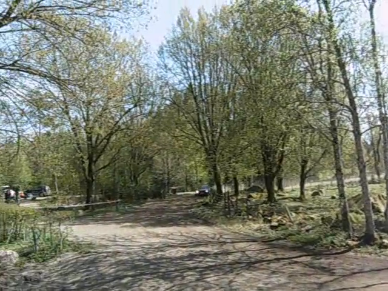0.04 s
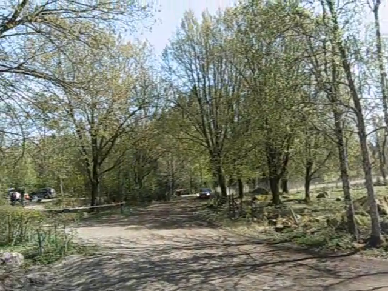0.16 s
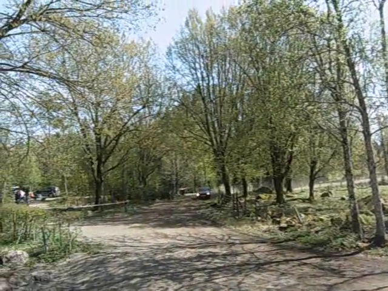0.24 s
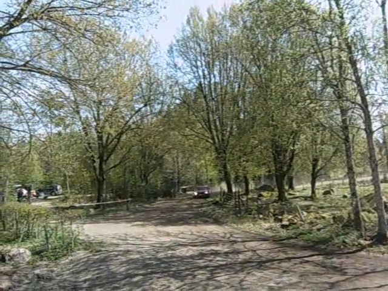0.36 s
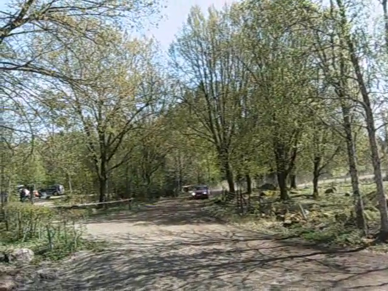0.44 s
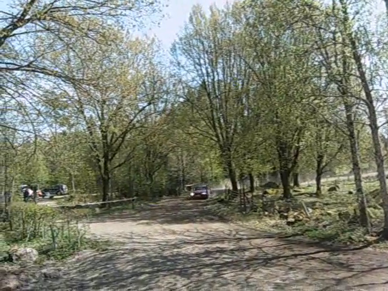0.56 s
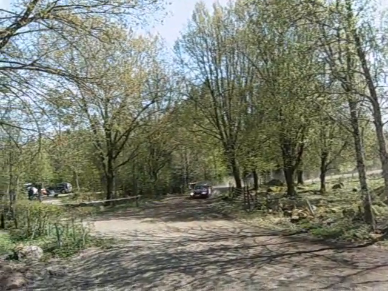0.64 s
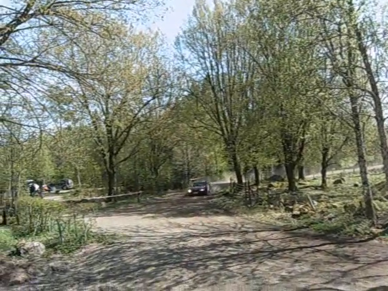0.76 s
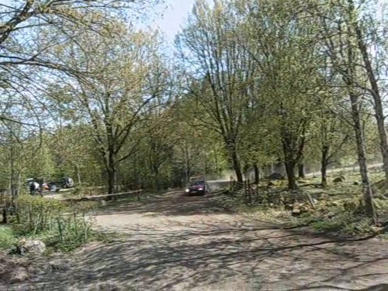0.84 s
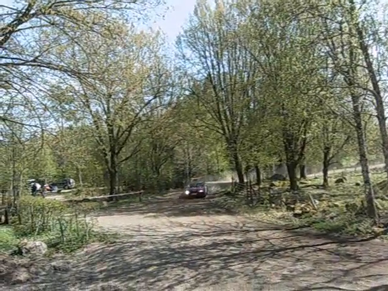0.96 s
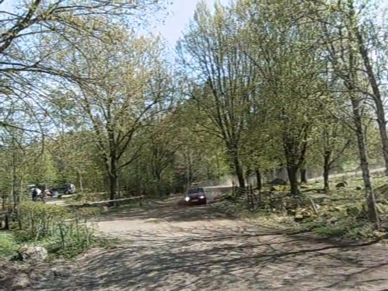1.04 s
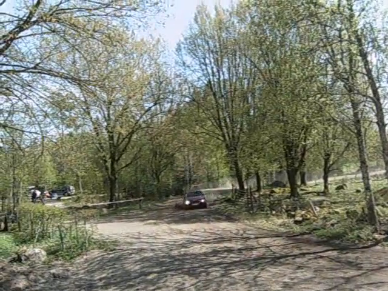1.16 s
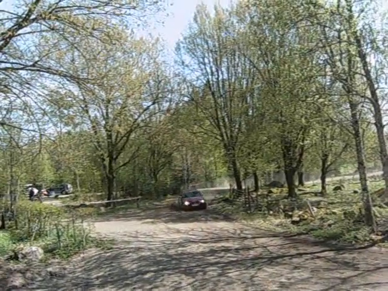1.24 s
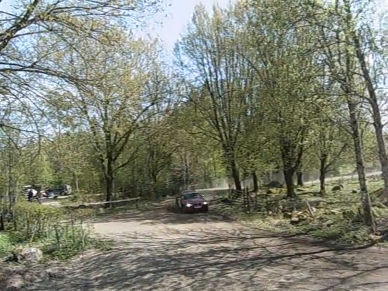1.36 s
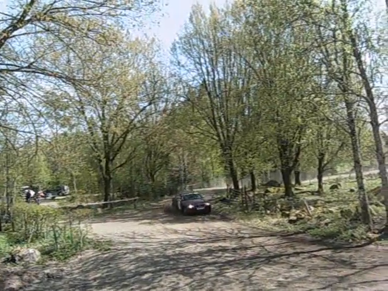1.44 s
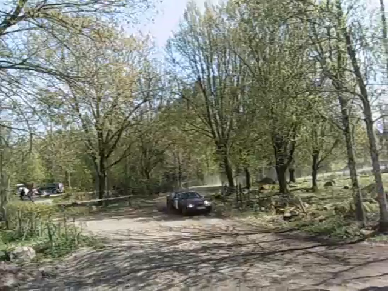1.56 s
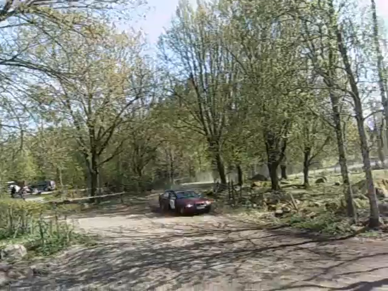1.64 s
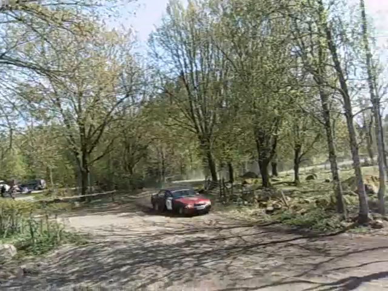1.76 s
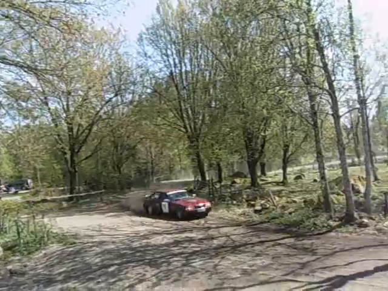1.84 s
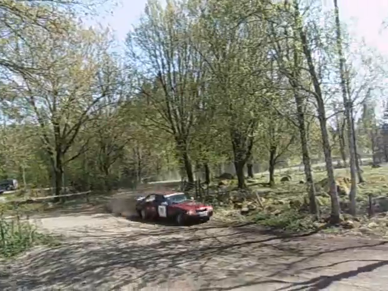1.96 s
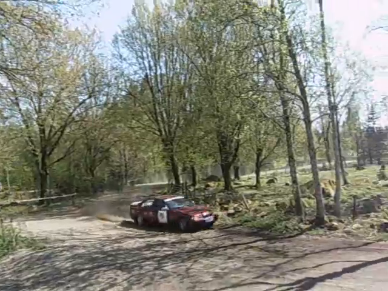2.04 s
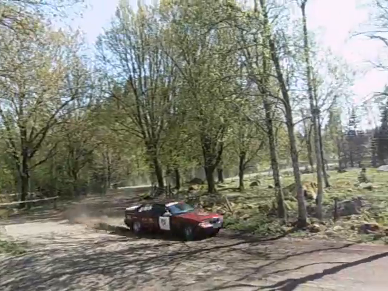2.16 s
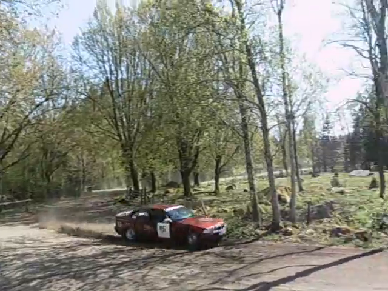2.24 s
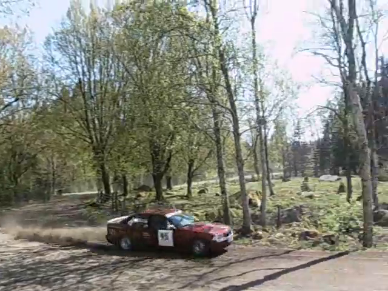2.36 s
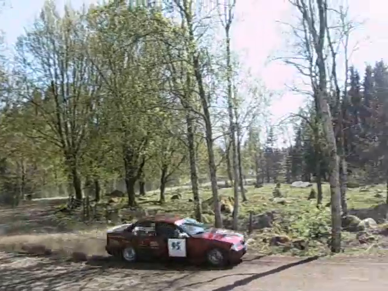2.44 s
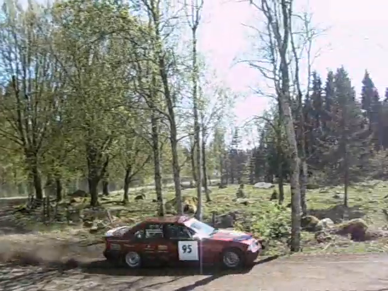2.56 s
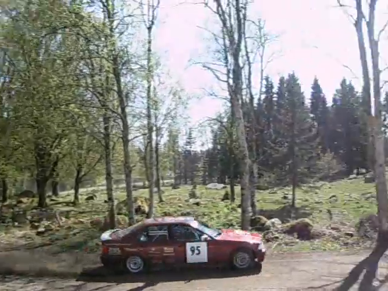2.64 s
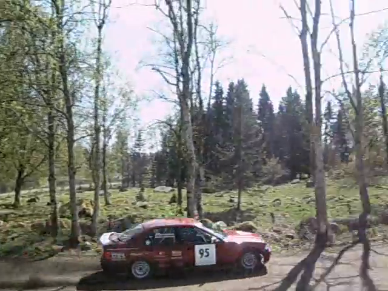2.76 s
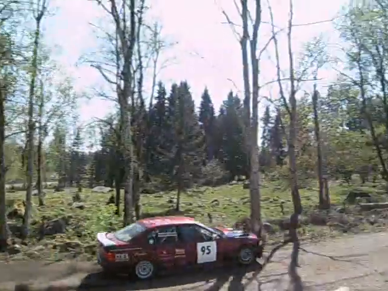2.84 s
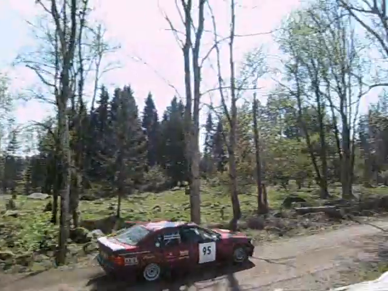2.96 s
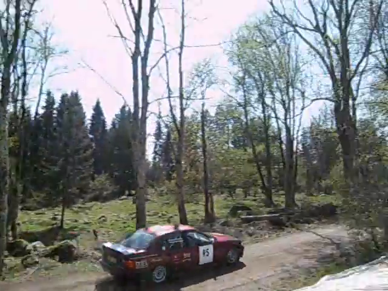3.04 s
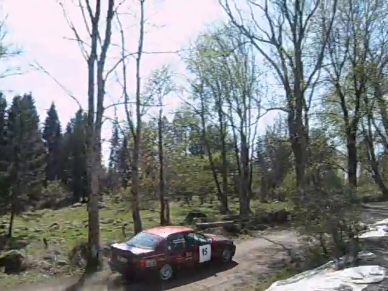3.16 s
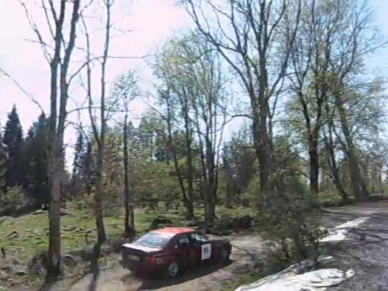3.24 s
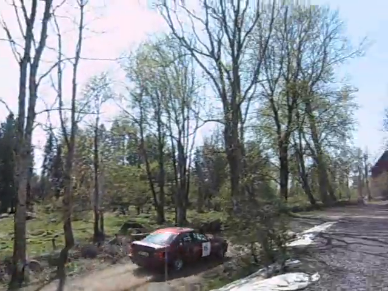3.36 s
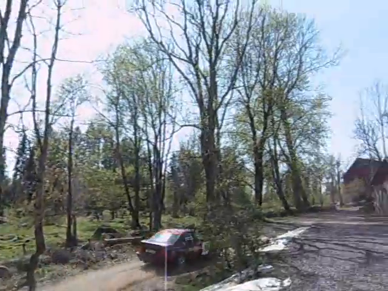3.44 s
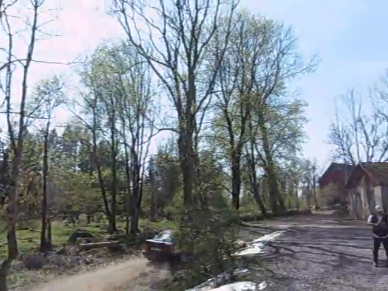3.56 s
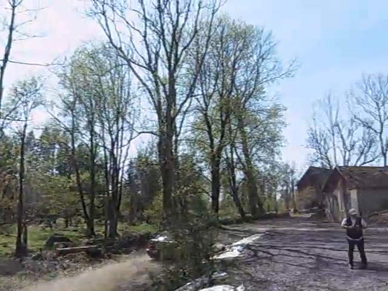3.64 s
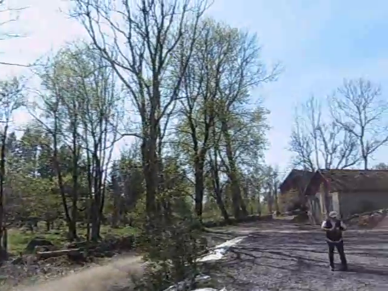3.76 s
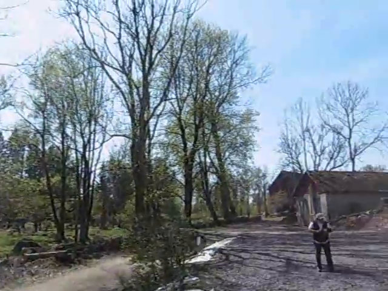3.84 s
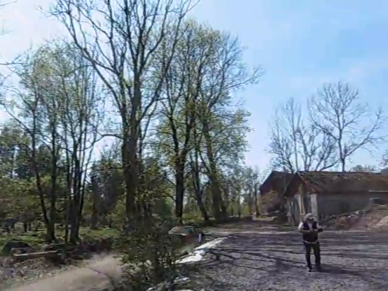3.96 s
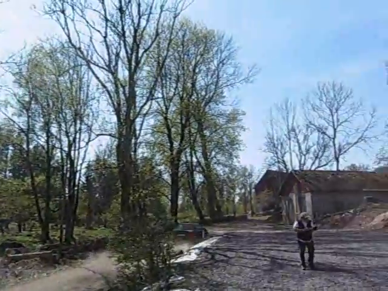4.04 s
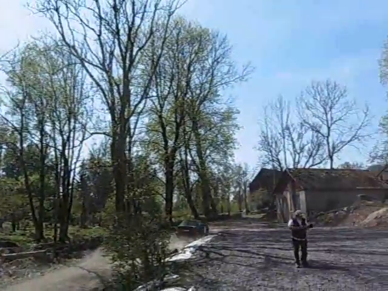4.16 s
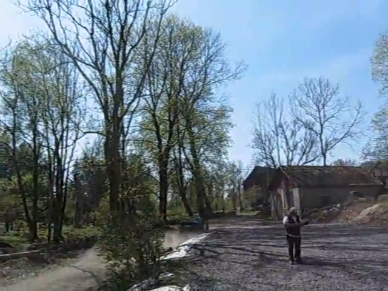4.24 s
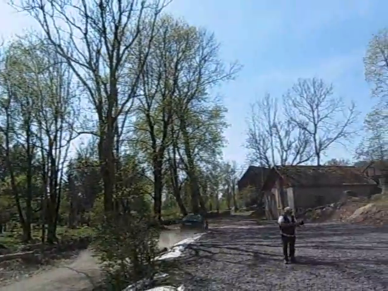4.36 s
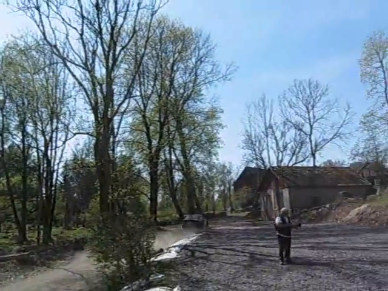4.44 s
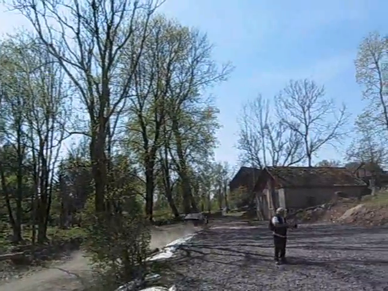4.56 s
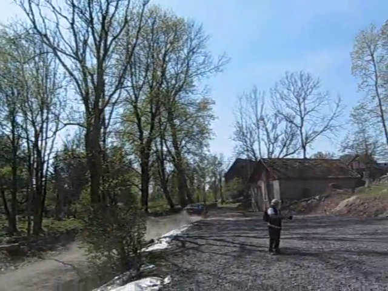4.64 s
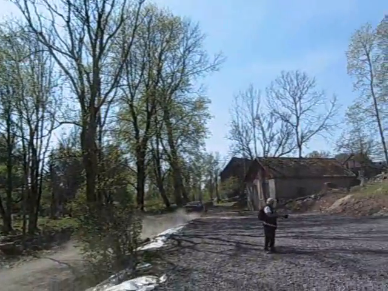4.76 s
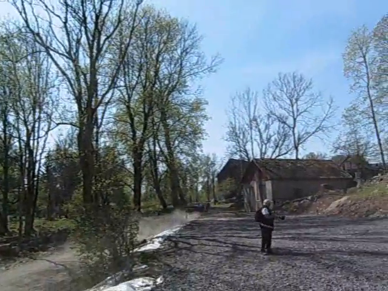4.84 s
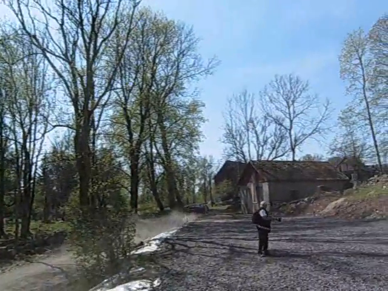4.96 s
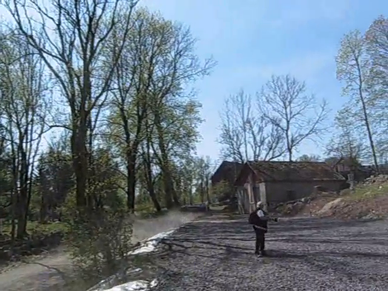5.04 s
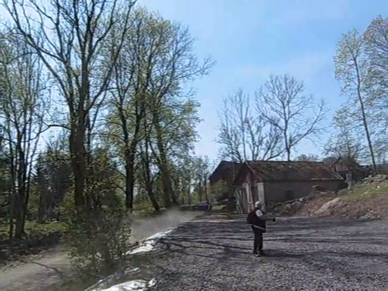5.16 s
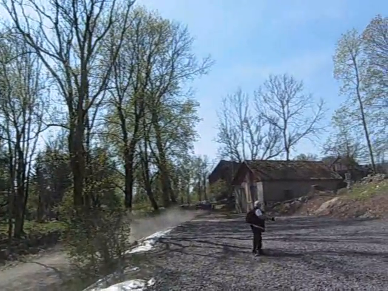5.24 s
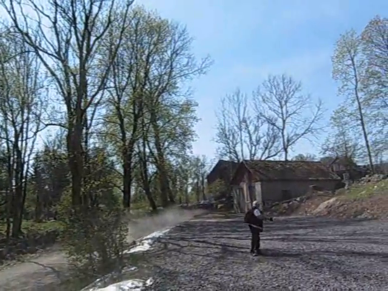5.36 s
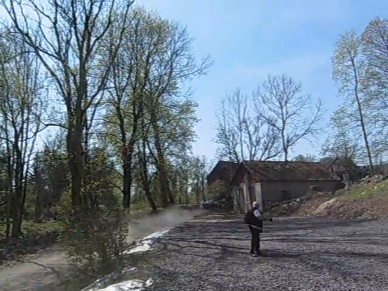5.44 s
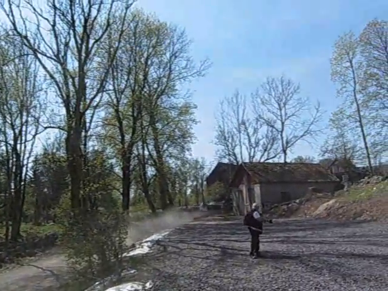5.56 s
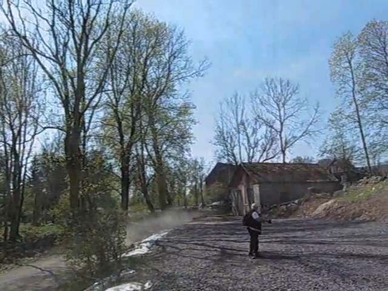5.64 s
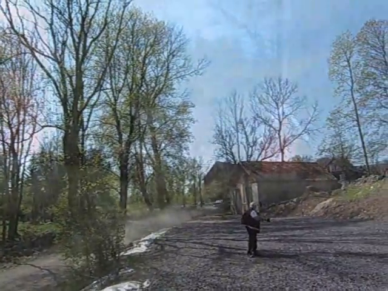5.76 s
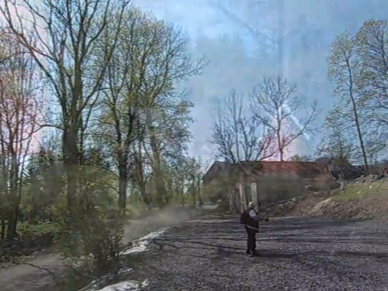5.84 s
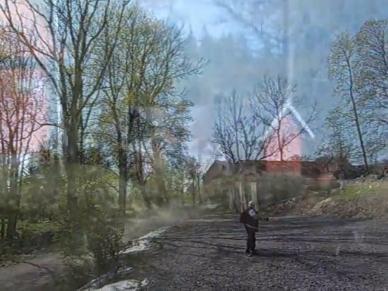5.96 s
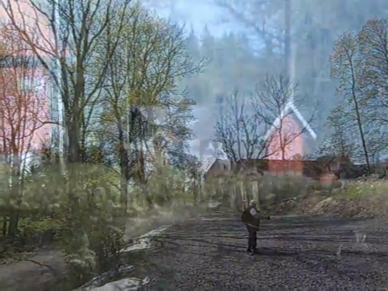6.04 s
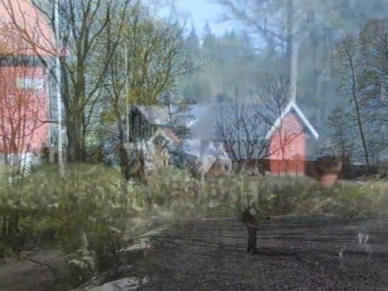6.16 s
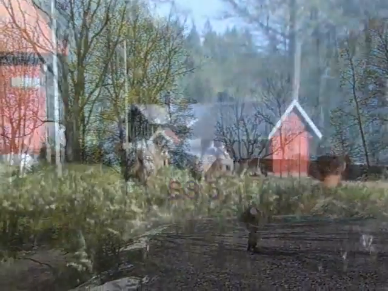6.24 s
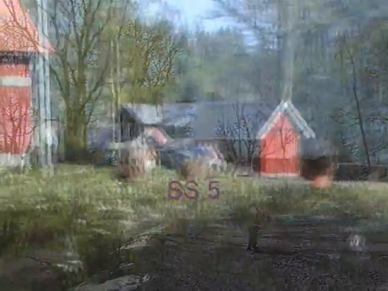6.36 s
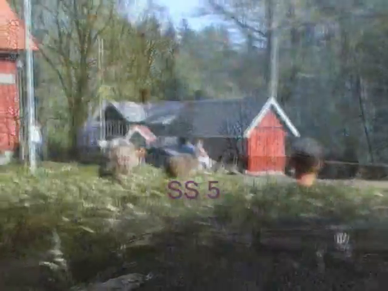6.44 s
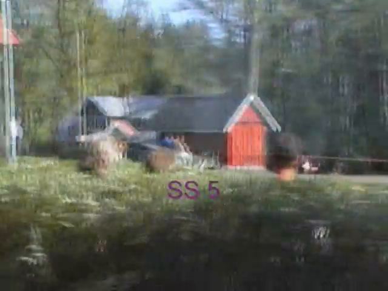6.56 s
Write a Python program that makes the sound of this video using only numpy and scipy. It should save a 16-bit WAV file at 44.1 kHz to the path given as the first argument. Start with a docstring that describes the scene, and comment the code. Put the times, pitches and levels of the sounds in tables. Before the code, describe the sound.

Outdoors on a forest gravel road, a six-cylinder rally car is faint and off throttle, then floors it after a second. The hard, buzzing note climbs and peaks close by at three seconds with gravel hiss and stone clicks. It recedes, lifting twice and reopening. A cheap small microphone adds gritty metallic treble; finally a dull far engine fades in.

```python
"""On a gravel road, a six-cylinder rally car comes out of a wood, floors the throttle, passes close and lifts twice.
The engine is a stack of steady tones plus puffing noise; tyres hiss on gravel, stones click, low air rumbles.
A small camera samples 8000 times a second and holds each value, which mirrors the engine note into the treble.
At the end the sound cross-fades to another, far engine, a smeared note in a dull roar with two sharp ticks,
heard through a full-band microphone."""
import sys
import numpy as np
from scipy import signal
from scipy.fft import rfft, irfft, next_fast_len
from scipy.io import wavfile

SR = 44100
rng = np.random.default_rng(int(sys.argv[2]) if len(sys.argv) > 2 else 0)


def gain_from_db(level_db):
    """Turn a decibel level (scalar or array-like) into a linear amplitude factor."""
    decades = np.asarray(level_db, float) / 20
    return 10 ** decades


def master_out(mix):
    """Clip the mix to full scale and print it as 16-bit PCM to the path in sys.argv[1]."""
    frames = np.transpose(np.atleast_2d(mix))
    ceiling = np.clip(frames, -1, 1)
    pcm = np.round(ceiling * 32767).astype(np.int16)
    wavfile.write(sys.argv[1], SR, pcm)


N = 291060  # length in samples

# low rumble of air and ground, before the engine gain: time_s, level_db
RUMBLE_LEVEL = [(0.0, -54), (.5, -51), (1.4, -50), (2.25, -43), (3.03, -40), (3.3, -50), (3.44, -37),
                (3.55, -51), (3.81, -55), (4.0, -42.5), (4.5, -44), (5.1, -46), (5.25, -55), (6.05, -54)]
# its tone: freq_hz, relative_db (per Hz)
RUMBLE_TONE = [(20, -13), (45, -9.5), (90, 1), (140, -3), (250, -6.5)]

# the far engine: time_s, firing_hz, note_db, roar_db
FAR_ENGINE = [(5.8, 224.7, -68, -49), (6.1, 234, -43, -43), (6.25, 246.3, -49, -36),
              (6.42, 251.2, -41, -33.5), (6.5, 245.8, -51, -34), (6.6, 243.5, -34, -33.5)]
# tone of its dull roar: freq_hz, relative_db (per Hz)
FAR_ROAR_TONE = [(24, -51), (40, -20), (90, -11), (145, -24), (245, 0.5), (297, -36), (335, -17.5),
                 (608, -16), (685, -12.5), (1050, -22), (1270, -22.5), (6450, -47.5), (12000, -55),
                 (15600, -91), (22000, -120)]
# a thin steady tone that rises and falls with the roar: pitch_hz, relative_db
FAR_WHINE = [(6395, -76)]
# dry ticks near the microphone, before filtering: start_s, relative_db, low_hz (weakened below this)
TICKS = [(6.346, -31, 2190), (6.351, -39, 2300), (6.361, -42, 2500), (6.528, -39, 6000)]

# tone of tyres on loose gravel: freq_hz, relative_db (per Hz)
GRAVEL_TONE = [(60, -33), (150, 0), (400, 6), (1000, 4), (1800, 1), (2500, 0.5), (3100, 2.5), (3600, 2.5),
               (4000, -3.5)]
# thrown stones landing, before filtering: start_s, relative_db
STONES = [(1.8167, -24), (3.095, -11), (3.221, -9.5), (3.435, -6.5), (4.072, -20), (4.1323, -26),
          (4.2773, -27), (4.3932, -40), (4.602, -30), (4.7959, -32), (5.166, -33), (5.326, -28),
          (5.487, -30), (5.7727, -31), (5.8535, -39)]
CRACKLES_PER_S, CRACKLE_DB = 15, 8  # small stones at random; typical level over the hiss

# firing rate as heard, Doppler shift included: time_s, firing_hz
FIRING_RATE = [(0.0, 219.2), (0.38, 171.2), (1.05, 173.8), (1.15, 187.2), (1.36, 236), (1.62, 271.1),
               (1.88, 293.4), (2.25, 291.3), (2.42, 303.4), (2.72, 312.7), (2.87, 304.7), (3.01, 284.8),
               (3.15, 287.2), (3.5, 280.1), (3.85, 288.4), (3.98, 299.5), (4.14, 303), (4.45, 240.6),
               (4.85, 207), (5.04, 185.7), (5.2, 205), (5.5, 204.9), (5.72, 213), (6.0, 212.2),
               (6.3, 217.2)]
# tone of the turbulent exhaust and intake: freq_hz, relative_db (per Hz)
RASP_TONE = [(60, -34), (120, -17), (200, -2), (500, 2), (1000, 1), (1600, -6), (2100, -17.5), (4000, -31)]
# Tones at multiples of the engine cycle (six firings), heard from each side of the car.
# Each of these seven tables: multiple (of the cycle rate), relative_db
VIEW_AFAR = [(1, -29), (2, -26), (3, -17), (4, -19), (5, -22), (6, -7), (7, -23), (8, -23), (9, -21),
             (10, -18), (11, -12), (12, 0), (13, -16), (14, -15), (15, -7), (16, -16), (17, -19), (18, -16),
             (19, -19), (20, -16), (21, -9), (22, -15), (23, -22), (24, -13), (25, -21), (26, -21),
             (27, -25), (28, -21), (29, -23), (30, -19), (31, -21), (32, -21), (33, -19), (34, -22),
             (35, -25), (36, -20)]
VIEW_FRONT = [(1, -30), (2, -22), (3, -11), (4, -12), (5, -20), (6, 0), (7, -19), (8, -23), (9, -16),
              (10, -12), (11, -16), (12, -6), (13, -14), (14, -17), (15, -17), (16, -15), (17, -23),
              (18, -10), (19, -17), (20, -17), (21, -15), (22, -17), (23, -22), (24, -19), (25, -29),
              (26, -26), (27, -22), (28, -21), (29, -15), (30, -20), (31, -25), (32, -26), (33, -27),
              (34, -27), (35, -30), (36, -26)]
VIEW_ABREAST = [(1, -41), (2, -32), (3, -24), (4, -20), (5, -32), (6, 0), (7, -22), (8, -26), (9, -17),
                (10, -20), (11, -23), (12, -8), (13, -22), (14, -26), (15, -23), (16, -30), (17, -34),
                (18, -17), (19, -28), (20, -30), (21, -24), (22, -30), (23, -35), (24, -23), (25, -31),
                (26, -36), (27, -28), (28, -30), (29, -34), (30, -22), (31, -22), (32, -30), (33, -23),
                (34, -28), (35, -35), (36, -42)]
VIEW_SIDE = [(1, -35), (2, -36), (3, -18), (4, -17), (5, -25), (6, 0), (7, -19), (8, -24), (9, -14),
             (10, -19), (11, -17), (12, -3), (13, -15), (14, -25), (15, -17), (16, -22), (17, -31),
             (18, -12), (19, -26), (20, -24), (21, -18), (22, -28), (23, -29), (24, -17), (25, -23),
             (26, -30), (27, -20), (28, -27), (29, -34), (30, -24), (31, -27), (32, -34), (33, -26),
             (34, -30), (35, -36), (36, -38)]
VIEW_PAST = [(1, -37), (2, -29), (3, -16), (4, -16), (5, -26), (6, 0), (7, -19), (8, -25), (9, -18),
             (10, -15), (11, -17), (12, -5), (13, -15), (14, -29), (15, -20), (16, -16), (17, -27),
             (18, -8), (19, -15), (20, -18), (21, -14), (22, -22), (23, -25), (24, -15), (25, -21),
             (26, -31), (27, -22), (28, -27), (29, -29), (30, -25), (31, -28), (32, -33), (33, -27),
             (34, -22), (35, -29), (36, -33)]
VIEW_TURNING = [(1, -30), (2, -24), (3, -17), (4, -16), (5, -22), (6, 0), (7, -18), (8, -23), (9, -11),
                (10, -22), (11, -22), (12, -3), (13, -18), (14, -23), (15, -13), (16, -21), (17, -26),
                (18, -7), (19, -15), (20, -20), (21, -12), (22, -18), (23, -23), (24, -10), (25, -20),
                (26, -25), (27, -18), (28, -24), (29, -29), (30, -19), (31, -25), (32, -28), (33, -21),
                (34, -25), (35, -30), (36, -28)]
VIEW_REAR = [(1, -39), (2, -33), (3, -27), (4, -28), (5, -28), (6, 0), (7, -26), (8, -32), (9, -16),
             (10, -33), (11, -28), (12, -10), (13, -25), (14, -28), (15, -21), (16, -24), (17, -32),
             (18, -13), (19, -28), (20, -30), (21, -18), (22, -21), (23, -27), (24, -12), (25, -27),
             (26, -32), (27, -27), (28, -32), (29, -35), (30, -29), (31, -36), (32, -36), (33, -29),
             (34, -32), (35, -33), (36, -29)]
# which side is heard: time_s, view (0 afar, 1 front, 2 abreast, 3 side, 4 past, 5 turning, 6 rear)
FACING = [(1.85, 0), (2.25, 1), (2.82, 1), (3.0, 2), (3.2, 2), (3.32, 3), (3.5, 3), (3.7, 4), (4.15, 4),
          (4.4, 5), (4.9, 5), (5.1, 6)]
# sound on throttle, one row per view: clean_db, rasp_db (both over the bark), unsteadiness (0 steady),
# hollowness (0-1), in_step (0-1, one cylinder pops harder)
ON_THROTTLE = [(-2, -5.5, .3, .85, .1), (-2.5, -7, 0.33, 1, .3), (-.3, -11, .1, .45, .1),
               (-.3, -12, .09, 0, .25), (-.3, -9.5, .1, 0.3, .5), (0, -9, .11, .32, 0),
               (.8, -11.5, .115, 0.45, .1)]
# the same five values with the throttle shut
OFF_THROTTLE = (-11, -2, 1.1, .35, 0)
# fixed peaks and dips blended into the noise, most of all with the car afar or head-on: freq_hz, gain_db
HOLLOW_TONE = [(200, 0), (380, -7), (520, 1), (1050, 1.5), (1280, -8), (1500, 4), (1750, -6), (1950, .5),
               (2150, -6), (2450, -.5), (4000, 0)]
# the throttle is floored, held and let go: open_s, opening_takes_s, close_s, closing_takes_s
THROTTLE = [(-.2, .05, 0.038, 0.18), (1.18, .04, 4.01, .14), (4.365, 0.074, 4.86, 0.074),
            (5.095, .045, 6.86, .1)]
FIRING_POWER = 2  # firing is steady only near full throttle: power of the throttle
# loss with the throttle shut, in dB
SHUT_NOTE_DB, SHUT_OCTAVE_DB, SHUT_BARK_DB, SHUT_GRAVEL_DB = -14, -21.5, -18.5, -7.5
# throttle open, as the car nears and leaves, before dips and final gains:
# time_s, note_db (firing note), octave_db, bark_db (exhaust), gravel_db
OPEN_LEVELS = [(0.02, -45.5, -57, -61, -60.5), (0.25, -40, -47, -46, -52.5), (0.6, -49, -50, -44, -55),
               (0.78, -40.5, -46, -31.5, -47.5), (1.08, -35.5, -49, -29, -49.5),
               (1.26, -23, -34.5, -38.5, -47), (1.4, -30.5, -32, -33, -38.5),
               (1.67, -30.5, -24, -29.5, -33), (2.0, -27.5, -28, -27.5, -29.5),
               (2.26, -21.5, -25, -28, -29.5), (2.7, -17.5, -20, -20.5, -25.5),
               (2.9, -15.5, -19.5, -22.5, -27), (3.04, -4.5, -14, -19.5, -28), (3.2, -9.5, -10, -17.5, -28),
               (3.67, -12.5, -15, -18, -32), (3.98, -18.5, -21.5, -23, -38), (4.18, -32, -28, -34, -40),
               (4.36, -33, -31, -29, -42), (4.46, -23.5, -23, -26.5, -42.5),
               (4.63, -30.5, -25.5, -31, -43.5), (4.8, -26, -27, -29, -48.5),
               (5.0, -21.5, -31, -27.5, -47.5), (5.2, -24, -30, -29.5, -44),
               (5.32, -19.5, -24.5, -29, -45.5), (5.54, -21.5, -27.5, -32, -45),
               (5.6, -26, -27.5, -31.5, -47), (5.95, -28.5, -32, -37, -50), (6.05, -40, -37, -45, -50)]
# brief dips, probably echoes cancelling the direct sound (some parts rise instead);
# at 2.914 s the exhaust drops, perhaps a gear shift: middle_s, half_length_s, note_db, octave_db, bark_db
DIPS = [(1.35, .06, -4, -7, 2), (1.546, 0.11, -15, -1, 0.5), (1.798, .12, -9.5, 0.5, -1),
        (2.05, 0.053, -13, 1, 3), (2.142, .09, -1.5, -8, -2), (2.326, .04, -19, 0.5, 0),
        (2.364, 0.049, -2, -17, -2), (2.697, 0.038, -4, 0, -0.5), (2.914, 0.078, -0.5, -1, -8),
        (5.303, 0.034, 1.5, -11, 1.5), (5.37, 0.053, -13, -7, -0.5), (5.48, 0.052, 1, -12, 1)]
FLUTTER_DB = 1.12  # random spread of the note, octave, bark and gravel levels
# change in the tones under the firing note as the car nears and leaves: time_s, gain_db
UNDERTONES = [(1.25, -10), (1.8, -2), (2.55, -1.5), (3.2, 2), (4.2, 1), (5, -1)]
BROKEN_DB = 8  # extra waver of note and octave, dB per unit of unsteadiness
# final gains of the passing car, steady until it fades out: time_s, engine_gain_db, gravel_gain_db
CAR_GAINS = [(6.0, -1, 4.5), (6.015, -0.5, -1.5), (6.2, -8, -8), (6.4, -9, -18), (6.6, -28, -30)]

CAMERA_HZ = 8000  # the small camera's sampling rate
# the small camera's offset, deeper while the car is loud and smaller when the throttle shuts:
# time_s, offset (share of full scale)
OFFSET = [(1.2, .0017), (3.9, -0.025), (4.3, -.014), (4.5, -0.024), (5.7, -0.023), (6.1, -0.013),
          (6.6, -0.0054)]
TOP_HZ = 16000  # nothing passes above this


def unit(x):
    """Scales a sound to rms 1."""
    return x / np.sqrt(np.mean(x ** 2) + 1e-20)


def curves(rows):
    """Gives one value per sample for each column after the time."""
    s, *cols = np.transpose(rows)
    return [np.interp(np.arange(N) / SR, s, c) for c in cols]


def wobble(rate):
    """Draws a random curve with rate knots a second."""
    knots = rng.standard_normal(int(N * rate / SR) + 4)
    return np.interp(np.arange(N) * rate / SR, np.arange(len(knots)), knots)


def filtered(x, response):
    """Multiplies the spectrum of x by a response, a function of frequency."""
    m = next_fast_len(N + 8192)
    return irfft(rfft(x, m) * response(np.fft.rfftfreq(m, 1 / SR)), m)[..., :N]


def coloured(x, points):
    """Shapes x by (Hz, dB) points, silent above the last, at rms 1."""
    f, db = np.transpose(points)

    def response(hz):
        return gain_from_db(np.interp(np.log(hz + 1), np.log(f), db)) * (hz <= f[-1])

    return unit(filtered(x, response))


def snap(s, decay_s):
    """Makes a burst of noise that starts at s and dies fast."""
    out, t = np.zeros(N + SR), np.arange(SR // 20) / SR
    out[round(s * SR):][:len(t)] = np.exp(-t / decay_s) * rng.standard_normal(len(t))
    return out[:N]


def throttle():
    """Throttle opening over time, 0 shut to 1 floored."""
    t = np.arange(N) / SR
    return sum(np.clip(np.minimum((t - on) / rise, 1 - (t - off) / fall), 0, 1)
               for on, rise, off, fall in THROTTLE)


def levels():
    """Note, octave, bark and gravel dB: nearness, less the shut throttle, plus the dips."""
    t, shut = np.arange(N) / SR, 1 - throttle()
    dips = sum(np.outer([*db, 0], np.clip(1 - abs(t - s) / half, 0, 1)) for s, half, *db in DIPS)
    loss = np.outer([SHUT_NOTE_DB, SHUT_OCTAVE_DB, SHUT_BARK_DB, SHUT_GRAVEL_DB], shut)
    return np.array(curves(OPEN_LEVELS)) + loss + dips


def aspect():
    """Clean tones, rasp, unsteadiness, hollowness and the odd strong pop, from side heard and throttle."""
    facing, firing = curves(FACING)[0], throttle() ** FIRING_POWER
    mixed = []
    for on, off in zip(np.transpose(ON_THROTTLE), OFF_THROTTLE):
        on_now = np.interp(facing, range(len(ON_THROTTLE)), on)
        mixed.append(off + firing * (on_now - off))
    return mixed


def hollowed(x):
    """Blends the plain sound with one coloured by fixed peaks and dips."""
    f, db = np.transpose(HOLLOW_TONE)
    share = np.clip(aspect()[3], 0, 1)
    hollow = filtered(x, lambda hz: gain_from_db(np.interp(hz, f, db)))
    return x + share * (hollow - x)


def rumble():
    """Low rumble of air and ground: noise kept to the bass, its level lumpy."""
    level_db = curves(RUMBLE_LEVEL)[0] + 1.5 * wobble(8)
    return gain_from_db(level_db) * coloured(rng.standard_normal(N), RUMBLE_TONE)


def ticks():
    """Dry ticks near the microphone: very short noise bursts with the bass thinned out."""
    out = np.zeros(N)
    for s, db, low_hz in TICKS:
        burst = snap(s, decay_s=0.0019)
        thin = filtered(burst, lambda f: np.clip(f / low_hz, 0, 1) ** 3 * np.clip((12500 - f) / 6000, 0, 1))
        out += gain_from_db(db + 2.5) * thin
    return out


def far_engine():
    """A far engine: a note with weak overtones, smeared by random phase, in a dull roar with a thin whine."""
    hz, note_db, roar_db = curves(FAR_ENGINE)
    phase = 2 * np.pi * np.cumsum(hz) / SR
    overtones = [(.5, -9), (1, 2.5), (2, -5.0), (3, -10)]  # multiple, relative_db
    note = sum(gain_from_db(db + 4.6 * wobble(17)) * np.cos(k * phase + 1.3 * wobble(30)) for k, db in overtones)
    roar = gain_from_db(roar_db + 0.97 * wobble(30)) * coloured(rng.standard_normal(N), FAR_ROAR_TONE)
    t = np.arange(N) / SR
    whine = sum(gain_from_db(db + roar_db + 41 + 2.5 * wobble(12)) * np.sin(2 * np.pi * f * t) for f, db in FAR_WHINE)
    return (t > FAR_ENGINE[0][0]) * (gain_from_db(note_db) * note + roar + whine)


def gravel():
    """Tyres on gravel: a hiss of crunching grains, clumped, with single stones clicking on top."""
    level_db = levels()[3] + FLUTTER_DB * wobble(17)
    clumps = gain_from_db(0.75 * wobble(60) + 0.65 * wobble(300) + 0.48 * wobble(15))
    hiss = gain_from_db(level_db + 0.5) * coloured(clumps * rng.standard_normal(N), GRAVEL_TONE)
    stones = sum(gain_from_db(db - 3.0) * snap(s, decay_s=0.0043) for s, db in STONES)
    hit_db = level_db + CRACKLE_DB + 2.8 * rng.standard_normal(N)
    hits = (rng.random(N) < CRACKLES_PER_S / SR) * gain_from_db(hit_db)
    tails = signal.lfilter([1], [1, -np.exp(-1 / (0.0026 * SR))], hits)  # decay time constant 2.6 ms
    crackle = tails * rng.standard_normal(N)
    # clicks lose their bass, and stop at the highest pitch the camera can follow
    clicks = filtered(stones + crackle,
                      lambda hz: np.clip((hz - 1800) / 1000, 0, 1) * (hz < CAMERA_HZ / 2))
    return hollowed(hiss) + clicks


def engine():
    """The six-cylinder engine: clean tones on the engine cycle, plus rasp that puffs once a firing."""
    cycle = 2 * np.pi * np.cumsum(curves(FIRING_RATE)[0]) / SR / 6  # six firings make one cycle
    note_db, octave_db, bark_db = (db + FLUTTER_DB * wobble(14) for db in levels()[:3])
    facing = curves(FACING)[0]
    clean_db, rasp_db, unsteady, _, in_step = aspect()
    broken = np.minimum(unsteady, .4)
    # the less steady the firing, the more note and octave break up
    note_db, octave_db = (db + BROKEN_DB * broken * wobble(22) for db in (note_db, octave_db))

    tables = (VIEW_AFAR, VIEW_FRONT, VIEW_ABREAST, VIEW_SIDE, VIEW_PAST, VIEW_TURNING, VIEW_REAR)
    views = np.array([np.transpose(v)[1] for v in tables])
    # in each view, the tones from the 14th up together make 0 dB
    views = views - 10 * np.log10(np.sum(gain_from_db(views[:, 13:]) ** 2, axis=1, keepdims=True))

    tones, under_db = np.zeros(N), curves(UNDERTONES)[0]
    for k in range(1, views.shape[1] + 1):
        db = np.interp(facing, range(len(views)), views[:, k - 1]) + bark_db + clean_db
        db = db + (1.65 + 8 * broken) * wobble(9)
        db = db + (k < 6) * under_db
        db = {6: note_db - .5, 12: octave_db - 3.0}.get(k, db)  # firing note and octave have their own levels
        # multiples of six stack into sharp pulses; the others start at random unless in step
        start = -.05 * k + (1 - in_step) * rng.uniform(-np.pi, np.pi) * (k % 6 > 0)
        drift = unsteady * (1.7 + 0.074 * k) * wobble(15)  # off throttle, uneven firing smears the tones
        tones += np.sqrt(2) * gain_from_db(db) * np.cos(k * cycle + start + drift)

    puffs = np.exp(0.62 * np.cos(6 * cycle - .4))
    rasp_level = gain_from_db(bark_db + rasp_db + 0.5 + 0.59 * wobble(24.7))
    rasp = rasp_level * coloured(puffs * rng.standard_normal(N), RASP_TONE)
    return tones + hollowed(rasp)


def small_camera(x):
    """The input clips, and each sample is held until the next one, so the wave climbs in steps."""
    step = np.floor(np.arange(N) * CAMERA_HZ / SR)
    x = np.clip(x + curves(OFFSET)[0], -.95, .95)
    held = np.round(step * SR / CAMERA_HZ).astype(int)
    return x[np.minimum(held, N - 1)]


def scene():
    """Plays the passing car through the small camera, then the far engine and ticks."""
    engine_db, gravel_db = curves(CAR_GAINS)
    car = (rumble() + engine()) * gain_from_db(engine_db) + gravel() * gain_from_db(gravel_db)
    return (small_camera(car) + far_engine() + ticks())[None]


def top_cut(x):
    """Nothing passes above the cut-off."""
    return signal.sosfilt(signal.butter(12, 16370, fs=SR, output="sos"), x)


def record(dry):
    """Fades out the top 350 Hz below the upper limit and finishes the mix."""
    limited = filtered(dry, lambda hz: np.clip((TOP_HZ - hz) / 350, 0, 1))
    return top_cut(limited)


dry = scene()
out = record(dry)
master_out(out)
```